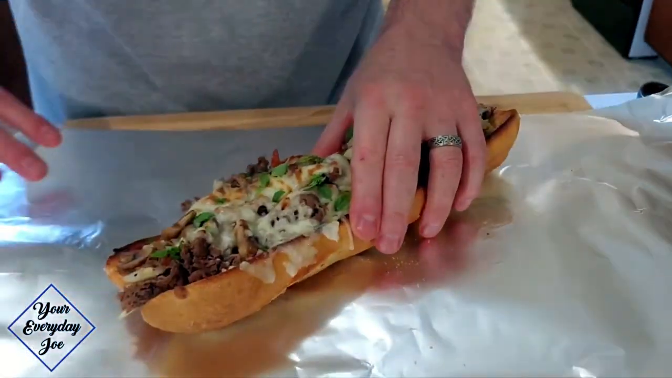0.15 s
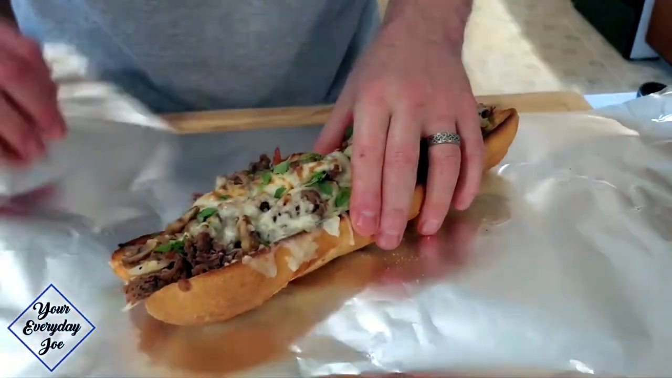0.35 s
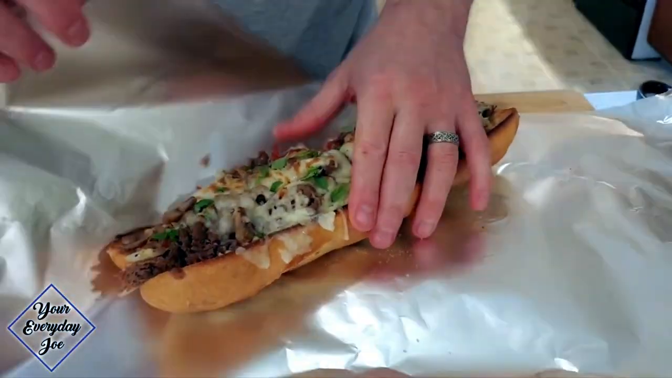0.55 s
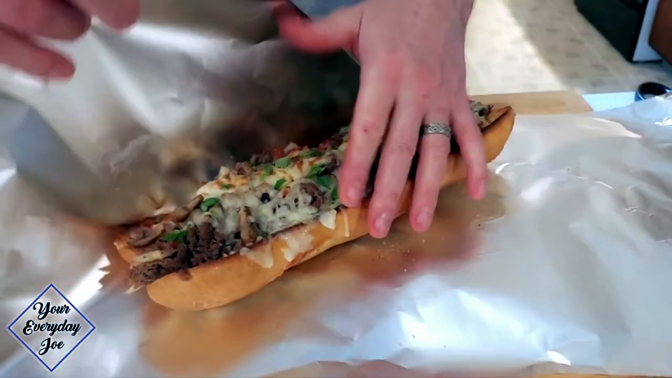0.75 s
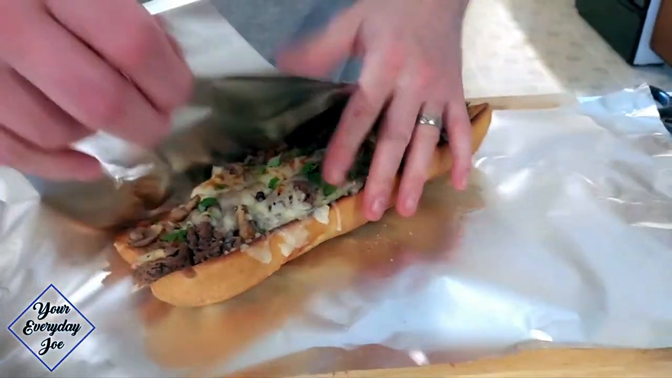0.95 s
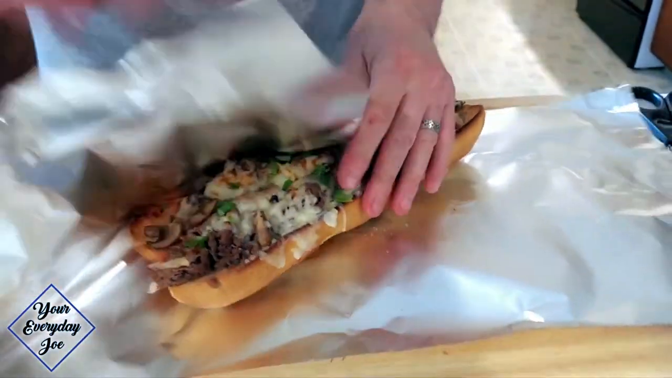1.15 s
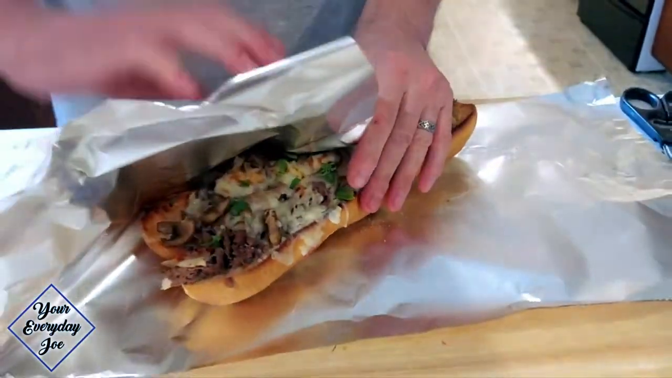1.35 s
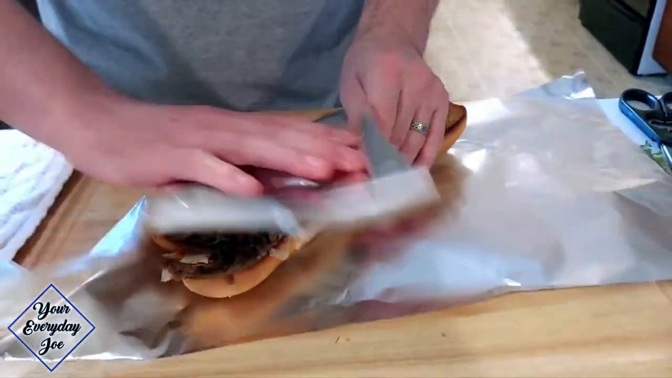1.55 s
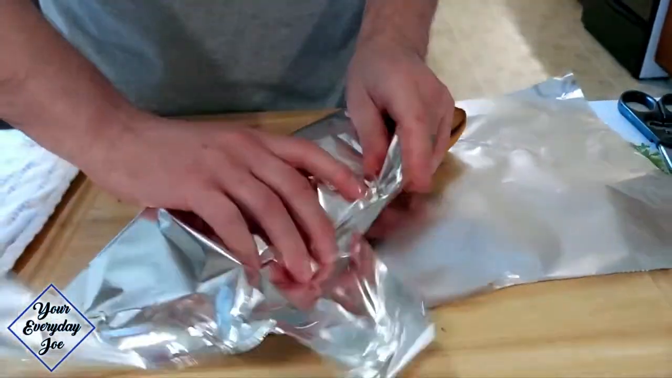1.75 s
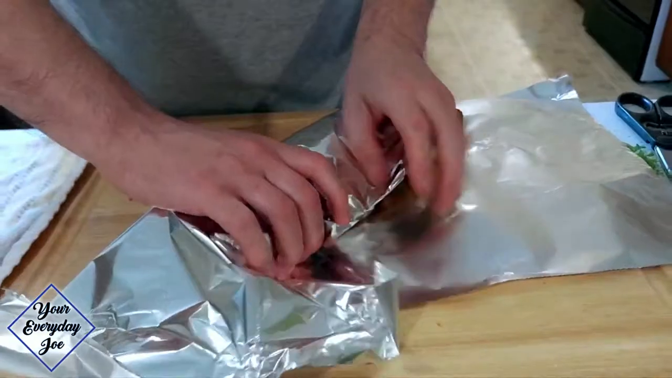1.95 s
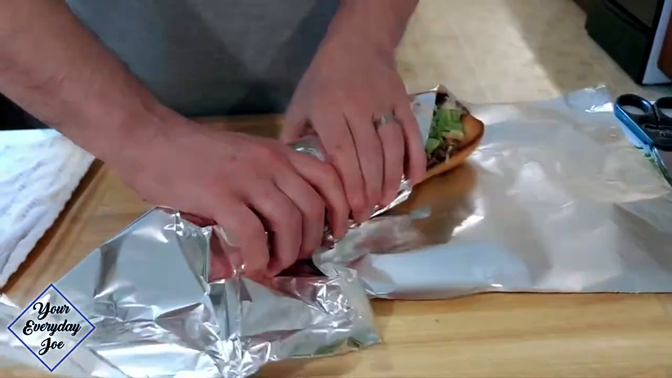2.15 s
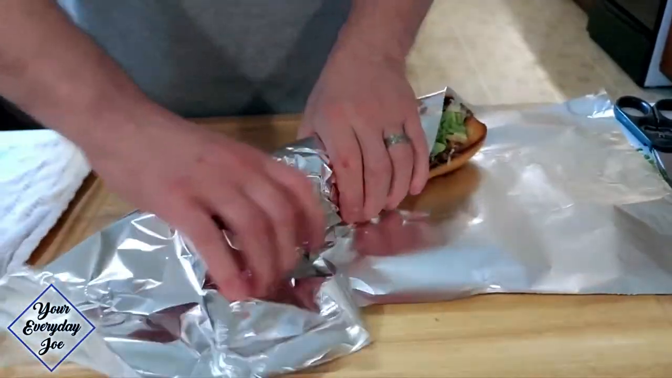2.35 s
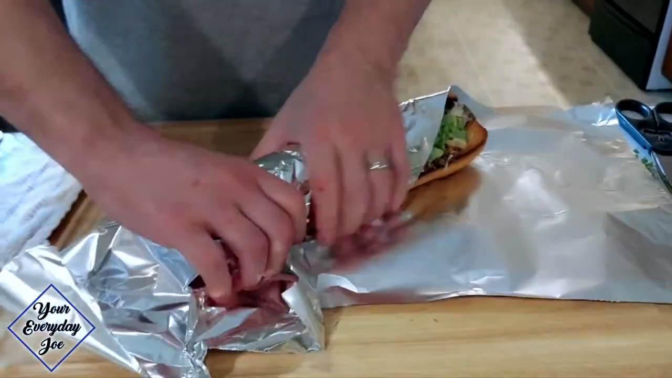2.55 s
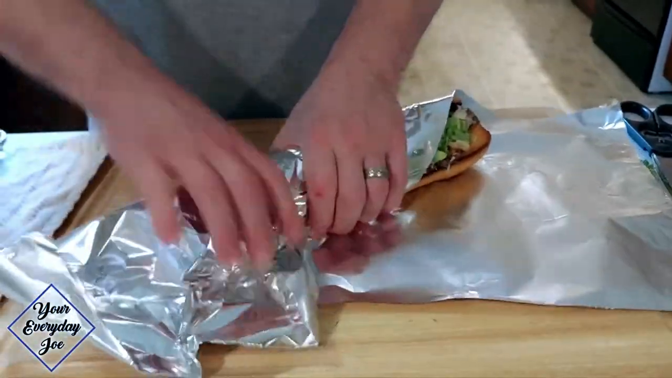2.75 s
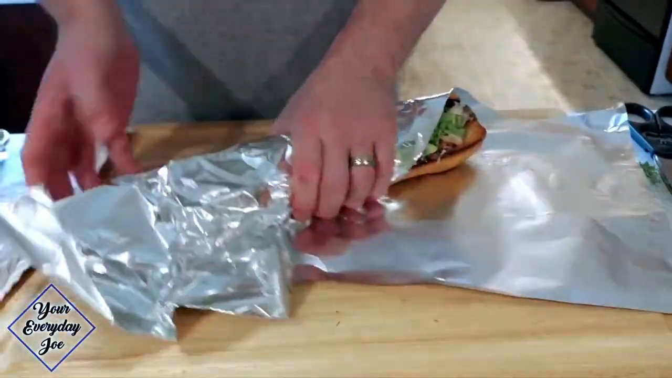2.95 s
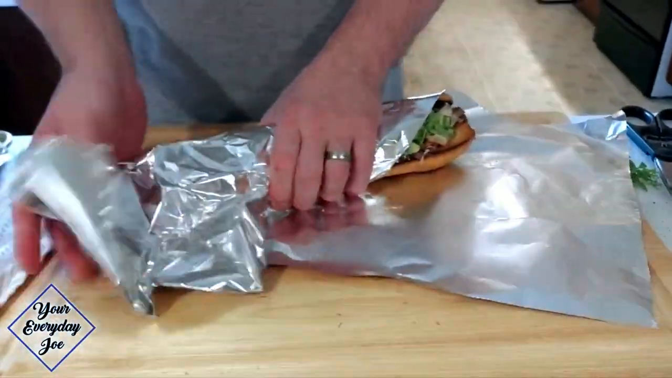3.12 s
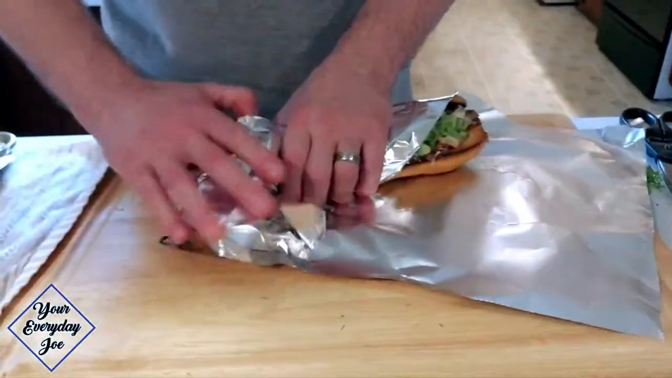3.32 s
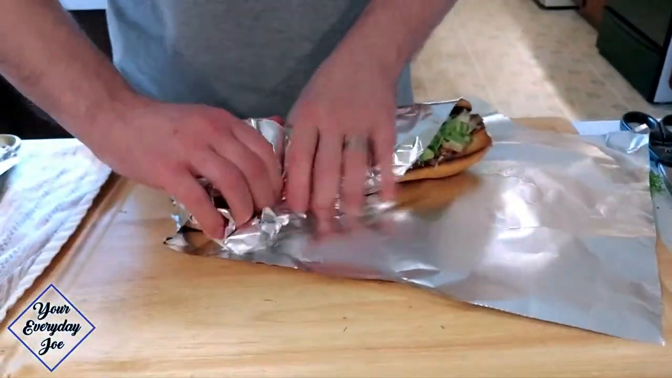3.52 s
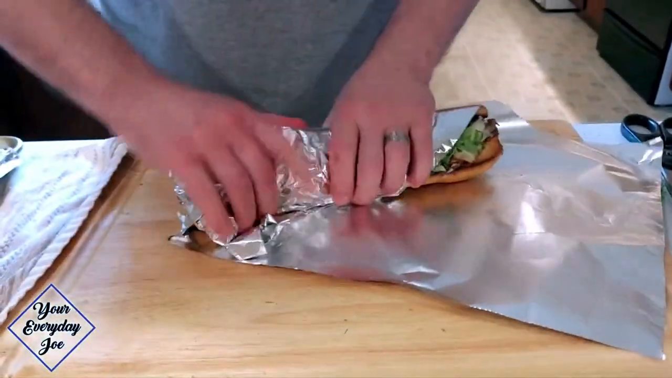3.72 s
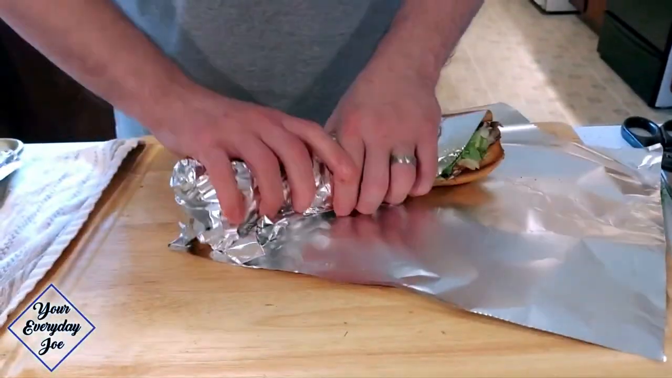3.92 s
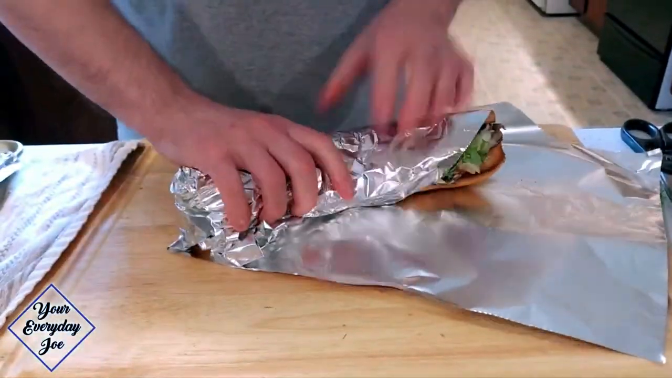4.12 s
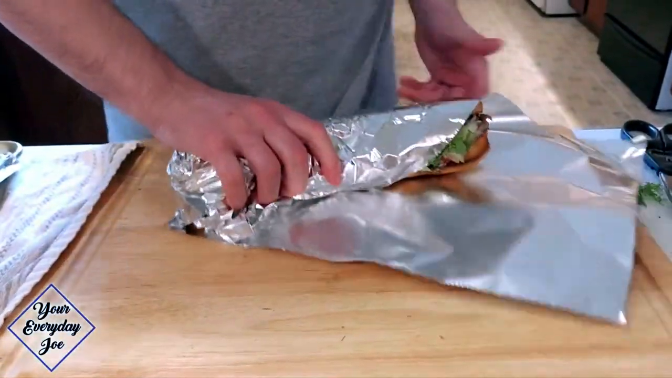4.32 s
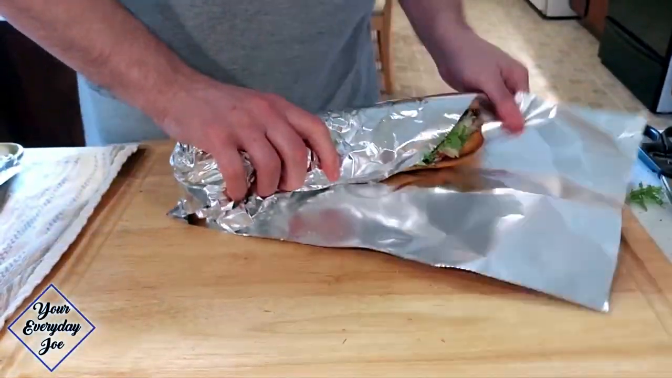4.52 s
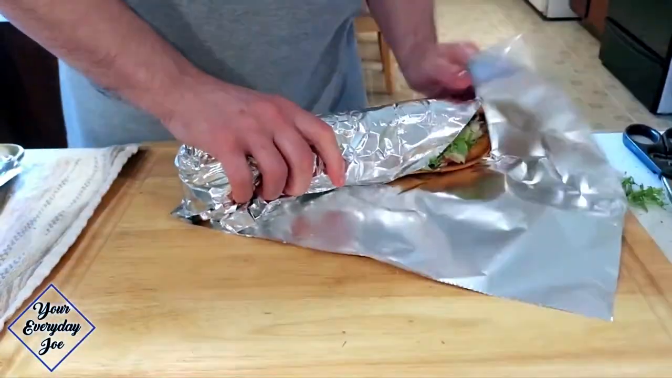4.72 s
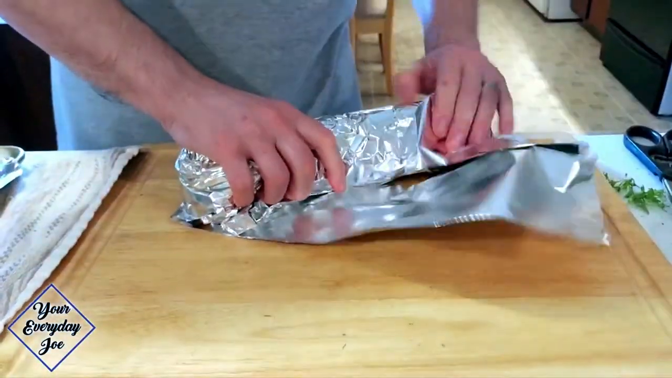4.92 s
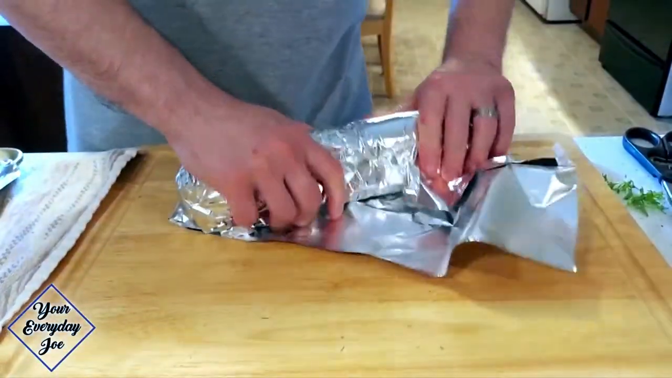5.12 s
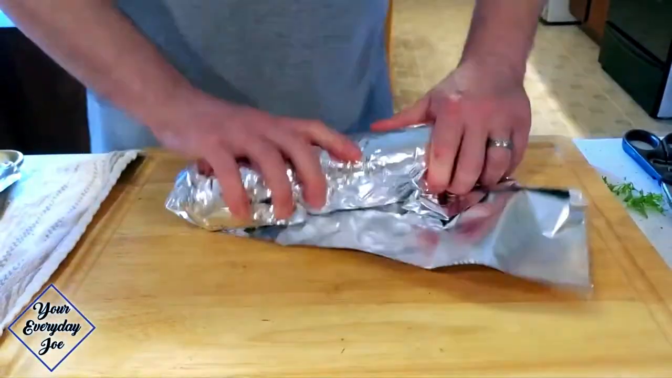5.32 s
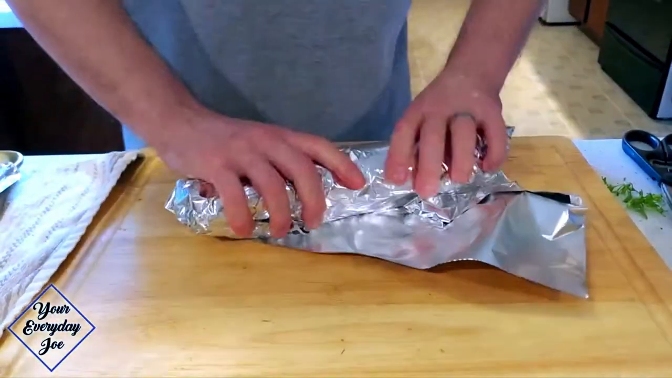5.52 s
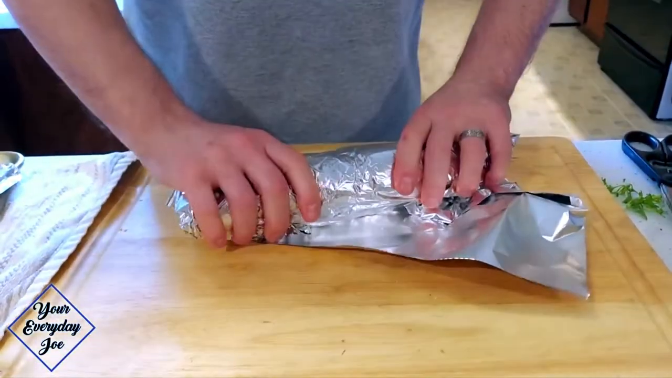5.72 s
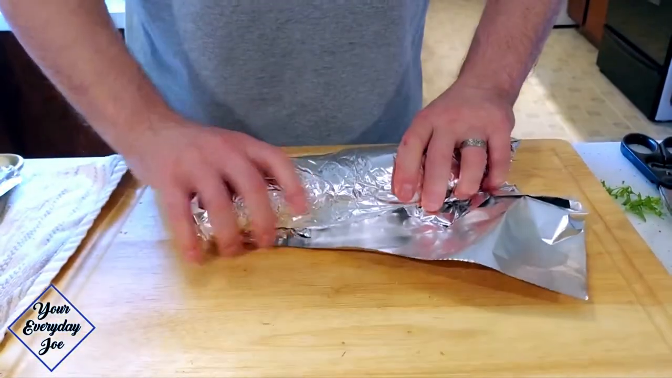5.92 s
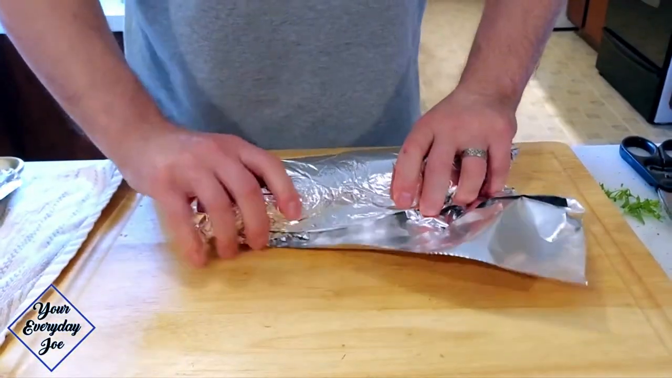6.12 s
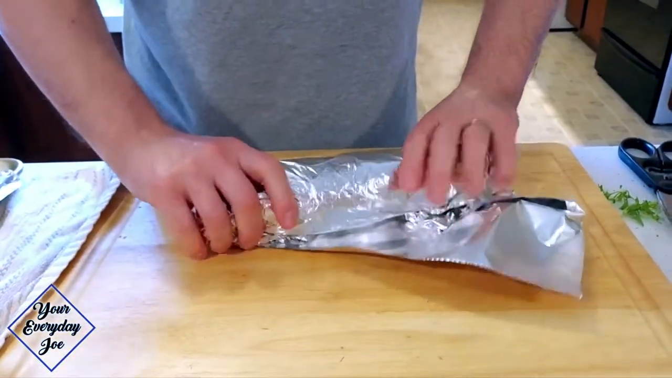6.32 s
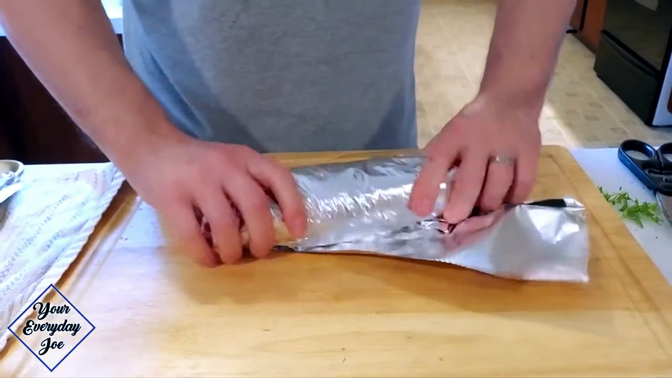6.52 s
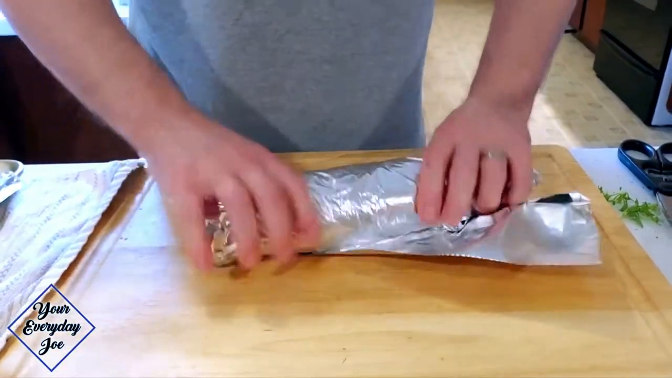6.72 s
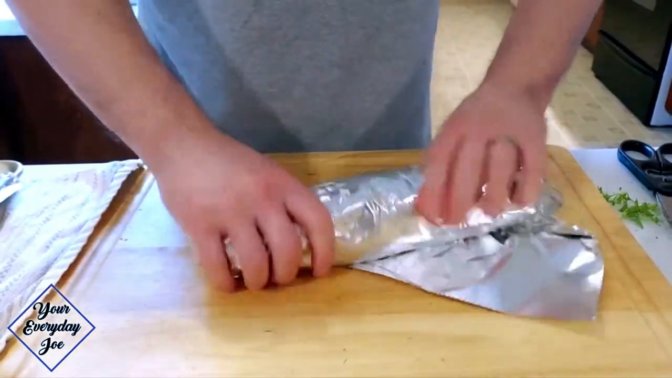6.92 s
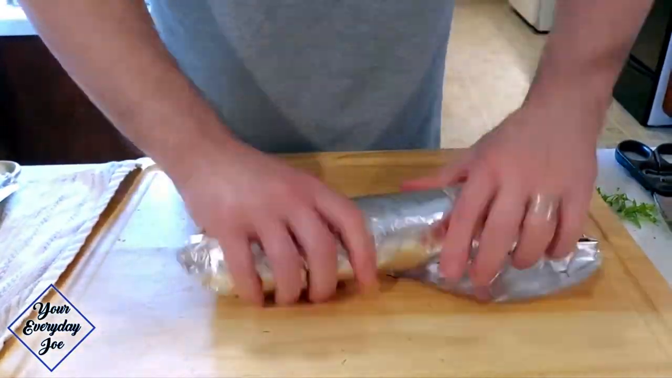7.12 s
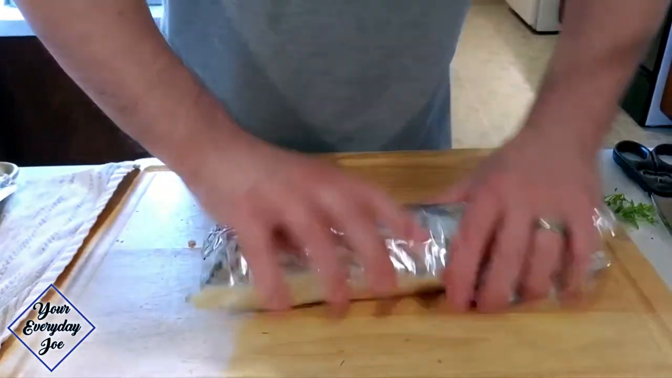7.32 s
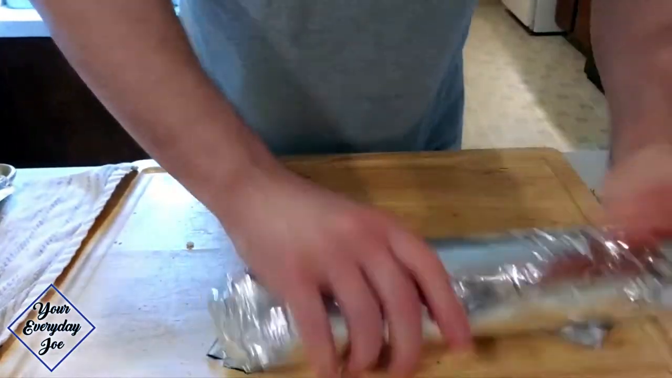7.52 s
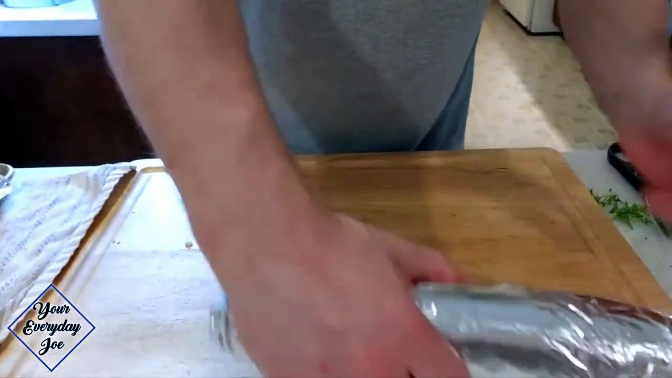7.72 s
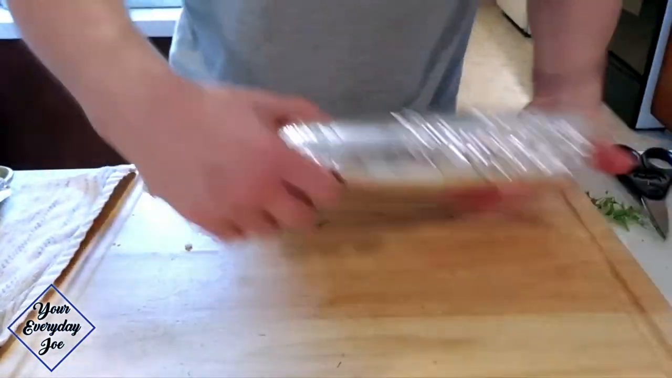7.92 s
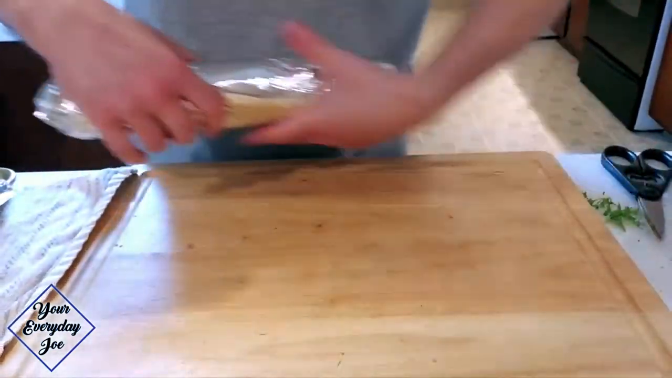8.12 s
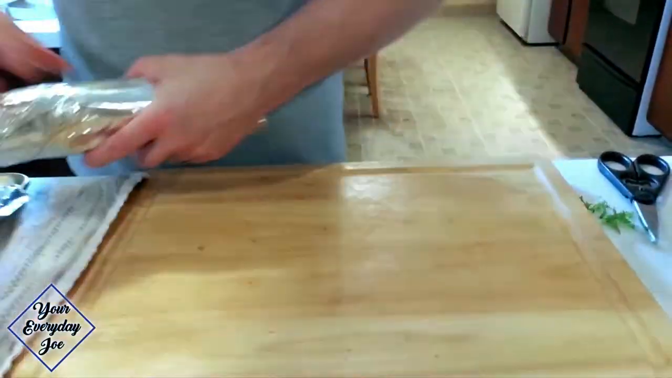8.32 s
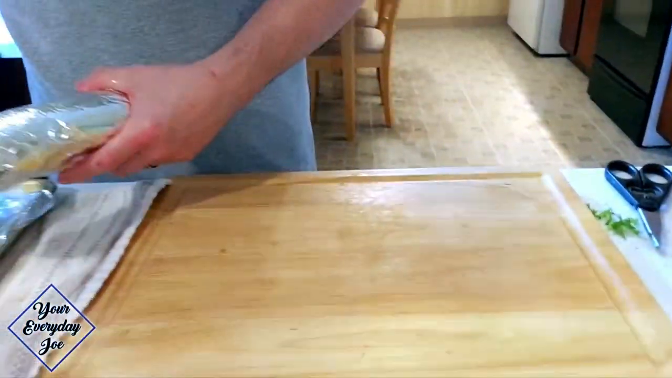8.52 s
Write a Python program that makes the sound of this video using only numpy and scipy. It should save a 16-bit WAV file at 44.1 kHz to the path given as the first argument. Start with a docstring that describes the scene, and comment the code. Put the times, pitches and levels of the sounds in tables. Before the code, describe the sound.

Out of near silence, a sheet of aluminum foil starts to rustle as hands fold it around a sandwich. Creases snap and each squeeze sets off a bright crackle, with small pops and soft booms as the sheet flexes. The crinkling briefly thins to dry ticks, then returns with low thuds on a wooden board. A few faint crinkles trail off. The microphone is close, in a quiet kitchen.

```python
"""Aluminium foil is folded and crushed by hand round a sandwich on a wooden board, close-miked in a kitchen.
Out of near silence the sheet starts to rustle: creases snap, each squeeze sets off a crackle of tiny
buckles, the open sheet booms softly as it flexes and air pockets pop. Around 6 s the crushed foil thins
to dry ticks, then the board thuds under the roll through a last run of squeezes. From 8 s a few faint
crinkles trail off into the hush."""
import sys
import numpy as np
from scipy import signal
from scipy.fft import rfft, irfft, next_fast_len
from scipy.io import wavfile
from scipy.ndimage import uniform_filter1d

SR = 44100
rng = np.random.default_rng(int(sys.argv[2]) if len(sys.argv) > 2 else 0)


def to_wav(sig):
    """Store sig (one row per channel, or 1-D mono) as 16-bit WAV at the path in sys.argv[1].

    Samples outside -1..1 are clipped; the rate is SR.
    """
    pcm = np.clip(np.atleast_2d(sig), -1, 1) * 32767
    pcm = np.round(pcm).astype(np.int16)
    wavfile.write(sys.argv[1], SR, pcm.T)  # frames by channels


N = 381773

# Levels are set ahead of the mix trims. An EQ gives only the shape of a spectrum.
# room tone: (frequency [Hz], level [dB])
HUSH_EQ = [(12, -57.5), (20, -19.5), (70, -14), (168, 0), (347, -7), (388, -24), (16000, -21.5)]
# where the foil sits between the mics: (time [s], lead of the left channel [samples])
LEFT_LEAD = [(0, 9.5), (1.3, 7), (1.8, 6.5), (4.2, 6.5), (4.7, -2.5), (7.2, -2.5), (7.7, -3.5), (8.6, 10)]
# state of the sheet: (time [s], left over right [dB], dryness from crushing [0-1], crackle trim [dB])
SHEET_STATE = [(0.2, 2, 0.1, 6.5), (0.55, 2, 0.25, 0), (0.72, 2, 0, -1), (1.33, -1, 0.6, 1),
               (1.61, 0.5, 0.38, -0.5), (2.17, -0.5, 0.44, 0.3), (3.02, 0.5, 0.2, -1.1),
               (4.58, -1, 0.12, 0.8), (5.09, 0, 0.2, -2), (5.92, -0.5, 0.88, 0), (6.1, 0, 0.66, -0.2),
               (7.5, -1, 0.47, 0.4), (7.66, -1.5, 0.44, 3), (7.92, -1.5, 0.26, 1.5), (8.34, 1, 0.7, 3.5),
               (8.65, -5.5, 0.23, 2)]
# rustle bed between squeezes: (time [s], sparkle [dB], body [dB], flexing relative to body [dB])
RUSTLE_BED = [(0.2, -106, -106, -20), (0.238, -81, -83, -30), (0.26, -43.5, -53.5, -40),
              (0.4, -41.5, -38.5, -13.5), (0.6, -25, -34, -9), (0.96, -64, -44.5, -3.5),
              (1.17, -33.5, -45, -2.5), (1.33, -52.5, -53.5, -38), (1.45, -39, -46.5, -4.5),
              (1.7, -31, -38.5, -9.5), (2.2, -39.5, -41.5, -10.5), (2.63, -39.5, -44, -12.5),
              (3.1, -31.5, -36.5, -6.5), (3.62, -36, -39, -16.5), (4.14, -48, -48, -19.5),
              (4.3, -33, -38.5, -7.5), (4.6, -30.5, -39.5, -9), (5.0, -37.5, -39, -13),
              (5.35, -32, -37, -9), (5.8, -53, -47, -34), (6.0, -51, -52, -26), (6.31, -42, -45.5, -52),
              (6.5, -45, -41.5, -22), (6.9, -32, -40.5, -9.5), (7.65, -39, -41, -15.5),
              (7.87, -86, -79, -43), (7.94, -69, -98, -32), (8.05, -58, -64, -40), (8.3, -60, -69, -38),
              (8.47, -105, -108, -22), (8.6, -115, -115, -11)]
# the foil's bands, from glittering top to soft bending: (frequency [Hz], level [dB])
SPARKLE_EQ = [(4120, -39.5), (7000, -6.5), (8470, 2), (10100, -1.5), (12400, 3.5), (15100, 0.5),
              (15900, -1)]
CRACKLE_EQ = [(1470, -32.5), (2500, -12.5), (3570, -0.5), (7000, -0.5), (9100, -7), (15400, -120)]
BODY_EQ = [(310, -30.5), (520, -9), (651, 1.5), (1020, -2.5), (1510, 0), (1800, 0), (2130, 1), (2590, -3.5),
           (2800, -2.5), (3640, -4.5), (6160, -120)]
FLEX_EQ = [(180, -68), (270, -18.5), (330, -1.5), (410, 2.5), (520, 3), (680, 2.5), (1140, -120)]
# creases giving way: (time [s], level [dB], body relative to that level [dB])
CREASE_SNAPS = [(0.242, -28.5, -35), (0.481, -10, -13.5), (0.553, -18.5, -24.5), (0.685, -13.5, -4),
                (0.7776, -17, -12), (0.843, -23, -16), (0.9202, -8, -20.5), (0.9877, -23, -19),
                (1.0863, -16, -18), (1.247, -24.5, -19), (1.298, -26, -31), (1.38, -34.5, -5),
                (1.3936, -18.5, -12), (1.5437, -25, -21), (1.6387, -13, -11), (1.7594, -20, -21),
                (1.8437, -20, -23), (2.004, -18, -24), (2.274, -18.5, -25), (2.39, -8.5, -24),
                (2.4249, -19, -21), (2.556, -19.5, -7), (2.596, -21, -4), (2.6654, -16.5, -25),
                (2.796, -16, -30), (2.884, -16, -8), (2.9804, -20.5, -6), (3.108, -11, -22),
                (3.1672, -17.5, -18.5), (3.18, -20.5, -23.5), (3.24, -16.5, -15), (3.491, -16.5, -2),
                (3.6671, -23.5, -17), (3.682, -11, -23), (3.725, -13, -7), (3.758, -16.5, 0.5),
                (3.775, -13.5, -8), (3.919, -19, -15), (3.979, -13.5, -36), (4.0362, -15.5, -27),
                (4.1041, -22, -9), (4.174, -27.5, 6.5), (4.201, -12, -26), (4.2783, -18.5, -20),
                (4.3244, -13, -22), (4.4425, -10, -31), (4.4792, -7.5, -34.5), (4.7, -12, -25.5),
                (4.823, -10.5, -34), (4.843, -8.5, -24), (5.024, -11, -23), (5.0924, -11.5, -11),
                (5.134, -20.5, 1.5), (5.219, -19, -22), (5.262, -19, -16.5), (5.314, -22, -0.5),
                (5.4913, -19.5, -28), (5.5647, -17, -25), (5.665, -21, -21), (5.6925, -21, -22),
                (5.8055, -30, -9), (5.876, -24.5, -17), (5.947, -26.5, -6.5), (6.1683, -25, -30),
                (6.3934, -20.5, -1.5), (6.4683, -23, 0), (6.535, -15, -12), (6.5799, -18, -22),
                (6.605, -16.5, -38), (6.685, -18, -6), (6.77, -17, -25), (6.801, -12, -27),
                (6.824, -18, -22), (6.925, -23, -24), (6.969, -22, -2.5), (7.057, -23.5, -4.5),
                (7.0936, -18.5, -12), (7.237, -10, -11), (7.2634, -20, -14), (7.306, -17, -6),
                (7.319, -15, -14), (7.3343, -12.5, -8.5), (7.3804, -15.5, -25), (7.419, -18, -26),
                (7.4445, -19.5, -21), (7.9706, -29, -32), (8.1793, -24, -9), (8.2093, -23.5, -8),
                (8.2658, -25.5, -11), ]
# squeezes of the hand, each a burst of buckles: (time [s], hold [s], sparkle [dB], body [dB])
HAND_SQUEEZES = [(.31, 0.041, -26, -45.5), (.36, 0.028, -21.5, -43), (.42, .02, -23.5, -37),
                 (.48, 0.044, -22, -38), (.7, 0.018, -18.5, -33.5), (.8, 0.05, -22.5, -37.5),
                 (.928, 0.003, -26, -44), (1.0, 0.0043, -26, -36), (1.095, 0.027, -29.5, -40),
                 (1.19, 0.016, -31, -59), (1.4, 0.0065, -51, -48), (1.49, 0.046, -31.5, -44.5),
                 (1.64, 0.13, -36, -40.5), (1.76, 0.055, -38, -53), (1.935, 0.0073, -26.5, -55),
                 (2.035, 0.0084, -28.5, -45), (2.1, 0.029, -29.5, -39), (2.195, 0.014, -40, -36.5),
                 (2.31, 0.052, -27.5, -38), (2.395, 0.069, -28, -38.5), (2.56, 0.058, -50, -44),
                 (2.7, 0.0078, -20, -37.5), (2.755, 0.0077, -27.5, -41.5), (2.94, 0.04, -32.5, -34),
                 (3.06, 0.034, -35.5, -34.5), (3.17, 0.02, -27.5, -35), (3.255, 0.009, -22, -27),
                 (3.35, 0.0066, -31, -33.5), (3.5, 0.025, -22, -42.5), (3.69, 0.016, -25, -39.5),
                 (3.78, 0.0063, -18, -40), (3.92, 0.011, -31, -41), (3.985, 0.027, -34, -42.5),
                 (4.05, 0.023, -37.5, -48.5), (4.21, 0.0034, -22.5, -49), (4.33, 0.023, -26.5, -44.5),
                 (4.49, 0.034, -20, -36), (4.63, 0.033, -28, -35), (4.71, 0.0044, -19.5, -71),
                 (4.84, 0.067, -24.5, -40), (4.995, 0.0052, -20.5, -36.5), (5.03, 0.0047, -20, -43.5),
                 (5.15, 0.038, -29.5, -36.5), (5.37, 0.0058, -25, -34.5), (5.5, 0.047, -48, -40.5),
                 (5.57, 0.055, -38, -50), (5.68, 0.013, -29.5, -38), (5.81, 0.0036, -42, -45),
                 (5.88, 0.015, -43, -45), (5.96, 0.036, -43, -41.5), (6.39, 0.0038, -46, -43),
                 (6.47, 0.029, -30.5, -42.5), (6.54, 0.014, -31, -41), (6.77, 0.076, -28, -36),
                 (6.93, 0.12, -38, -41), (7.1, 0.053, -32, -37.5), (7.245, .02, -36, -45),
                 (7.32, 0.048, -27.5, -38), (7.42, 0.011, -36, -35), (7.62, 0.1, -35.5, -48.5),
                 (7.975, 0.037, -44.5, -55), (8.1, 0.079, -50, -63), (8.18, 0.015, -48, -42.5),
                 (8.266, 0.023, -49.5, -52)]
# weight put on the board: (time [s], hold [s], board rumble [dB], boom of the open sheet [dB])
HAND_LEANS = [(.39, 0.12, -57, -52), (.5, 0.15, -58, -58), (.7, 0.014, -47.5, -34),
              (.8, 0.07, -48.5, -46.5), (.93, 0.077, -47.5, -44), (1.09, 0.023, -55, -50),
              (1.54, 0.1, -78, -73), (2.09, 0.12, -66, -62), (2.3, 0.055, -65, -70),
              (2.4, 0.033, -53, -53.5), (2.99, 0.012, -56, -37.5), (3.1, 0.047, -60.5, -50),
              (3.27, 0.01, -50, -40), (3.52, 0.12, -66, -92), (4.3, 0.081, -83, -83),
              (4.46, 0.11, -47.5, -58), (4.6, 0.027, -53, -42.5), (4.9, 0.043, -68, -73),
              (5.19, 0.019, -54, -62), (5.36, 0.014, -47, -56), (5.51, .02, -56, -80),
              (5.62, 0.11, -63.5, -94), (5.98, 0.04, -60.5, -78), (6.41, 0.034, -63, -70),
              (6.51, 0.016, -55, -80), (6.72, 0.046, -54, -64), (6.83, 0.015, -40, -54),
              (6.99, 0.073, -44.5, -67), (7.16, 0.068, -47, -67), (7.34, 0.018, -43.5, -78),
              (7.45, 0.082, -47, -56.5), (7.59, 0.031, -45, -66), (7.68, 0.062, -55, -73)]
# the board's rumble and the sheet's hollow boom: (frequency [Hz], level [dB])
RUMBLE_EQ = [(18, -49), (30, -20.5), (55, -1), (75, 0.5), (113, -3), (141, -5), (180, -15), (230, -50.5),
             (400, -120)]
BOOM_EQ = [(88, -32.5), (150, -4), (215, -8.5), (258, -3), (290, -3), (380, -6), (640, -120)]
# air pockets collapsing under the foil, and brief mid tones of a scrape at 7.6 and 8.21 s: (time [s], level
# [dB], pitch [Hz])
POCKET_POPS = [(0.515, -22.5, 617), (0.683, -26, 586), (0.989, -27.5, 910), (1.379, -28, 586),
               (2.085, -21, 524), (2.226, -26, 770), (2.285, -27.5, 762), (2.557, -25.5, 1860),
               (3.232, -15.5, 920), (3.255, -12.5, 600), (3.472, -17.5, 1640), (4.495, -13.5, 440),
               (5.218, -23.5, 736), (5.807, -31.5, 1620), (5.885, -26.5, 527), (5.947, -31, 1530),
               (6.391, -28, 1460), (6.796, -32, 1860), (6.834, -20.5, 1520), (6.926, -27, 1330),
               (7.415, -28, 670), (7.601, -23, 713), (8.18, -24, 1720), (8.21, -36, 706)]
# the foil falls quiet ahead of an accent: (end time [s], length [s], depth [dB])
FOIL_LULLS = [(0.914, 0.02, 4), (0.68, 0.034, 3.5), (2.384, 0.012, 1), (2.79, 0.029, 6), (3.77, 0.014, 12),
              (4.188, 0.035, 6), (5.216, .015, 5), (5.489, 0.061, 4.5), (5.794, 0.016, 6), (5.946, .02, 1),
              (6.459, 0.022, 2), (6.928, 0.018, 6.5), (7.968, 0.043, 20)]
# thuds on the board: (time [s], level [dB], pitch [Hz])
BOARD_THUDS = [(0.987, -49, 108), (1.083, -50, 97), (3.075, -38.5, 132), (5.35, -37.5, 81.5),
               (6.391, -39, 71.4), (6.71, -36.5, 74.4), (6.813, -35, 71), (6.977, -29, 75),
               (7.157, -29.5, 70), (7.322, -40, 95), (7.443, -31, 74.7), (7.67, -35.5, 66.4)]
# dents flipping over, each a dry tick: (time [s], level [dB], pitch [Hz])
DENT_TICKS = [(1.6612, -12.5, 11700), (1.8377, -13, 4300), (2.3905, -13.5, 11900), (2.4593, -19, 10900),
              (2.7982, -9.5, 13260), (3.181, -9, 8700), (3.4066, -11, 11100), (3.494, -8, 9000),
              (3.6462, -22, 6700), (3.7266, -7.5, 9100), (3.8945, -21, 7000), (3.9604, -21, 7600),
              (4.036, -19, 12470), (4.1758, -12, 2420), (4.2785, -25, 12500), (5.137, -36, 2720),
              (5.219, -10, 11700), (5.2625, -20.5, 9000), (5.3165, -17, 10000), (5.4933, -17, 10050),
              (5.521, -12.5, 3640), (5.7568, -21, 4200), (5.8075, -17, 3010), (5.8779, -21, 8100),
              (5.93, -27, 2610), (5.9486, -19, 3160), (5.9791, -21, 4980), (6.024, -26.5, 5100),
              (6.0789, -32, 4300), (6.0915, -25, 7000), (6.1407, -21, 4300), (6.17, -26, 11560),
              (6.189, -30, 7200), (6.318, -17, 4500), (6.3961, -21, 2280), (6.46, -23, 9000),
              (6.5186, -18, 2750), (6.638, -15, 15100), (6.7561, -13, 4050), (6.9275, -12, 13600),
              (7.0592, -14, 4900), (7.0776, -17, 6100), (7.129, -15, 5100), (7.1815, -16, 10850),
              (7.2023, -22, 3900), (7.239, -10, 8100), (7.491, -14.5, 6100), (7.5086, -17.5, 3300),
              (7.5821, -17, 12440), (7.5943, -15, 11400), (7.719, -25, 7140), (7.728, -27, 9000),
              (7.7425, -21, 5970), (7.913, -58, 5500), (7.7735, -33, 6250), (8.1803, -30, 2300),
              (8.2674, -21, 12340), (8.2912, -30, 7800), (8.611, -50, 7000)]

THIN_HZ = 420  # pings, pops and ticks are cut below this
SNAP_RISE_S, SNAP_RING_S = 0.0018, 0.078  # attack and t60 of a crease in the open sheet
DRY_SHORTENS, DRY_CRACK_DB = 0.24, 6  # fully crushed foil: share of ring lost, boost of the crack
TICK_RISE_S, TICK_FALL_S, TICK_CYCLES = 0.00025, 0.00015, 0.34  # the fall grows by this many cycles
TOP_HZ = 15810  # band limit of the output


def amp(db):
    """Decibels to amplitude; amp(2 * db) gives power."""
    return np.exp(np.asarray(db) * (np.log(10) / 20))


def unit(x):
    """Normalise to an rms of 1."""
    return x / np.sqrt(np.mean(x ** 2) + 1e-20)


def curves(rows):
    """Automation lanes: one value per sample for each column after the time."""
    times, *columns = np.transpose(rows)
    return [np.interp(np.arange(N) / SR, times, column) for column in columns]


def lead_at(s):
    """Samples by which the left channel leads at time s."""
    return np.interp(s, *np.transpose(LEFT_LEAD))


def filtered(x, response):
    """Zero-phase filter with gain response(hz)."""
    size = next_fast_len(N + SR // 4)
    return irfft(rfft(x, size) * response(np.fft.rfftfreq(size, 1 / SR)), size)[..., :N]


def colour(x, eq):
    """Apply an EQ on a log frequency axis, with make-up gain so white noise keeps its power."""
    points_hz, points_db = np.transpose(eq)

    def gain(hz):
        return amp(np.interp(np.log(hz + 1), np.log(points_hz + 1), points_db))
    return filtered(x, gain) / np.sqrt(np.mean(gain(np.linspace(0, SR / 2, 4000)) ** 2))


def fade(power, t60):
    """Give a power envelope a tail that falls 60 dB in t60 seconds, its sum kept."""
    keep = amp(-120 / (t60 * SR))
    return np.abs(signal.lfilter([1 - keep], [1, -keep], power))


def shimmer(shared, patchy_db):
    """Stereo noise flickering in time and pitch; the shared part reaches the nearer mic first."""
    hz, t, noise = signal.stft(rng.standard_normal((3, N), np.float32), SR, nperseg=256)
    patches = uniform_filter1d(rng.standard_normal(noise.shape[1:]), size=5, axis=0)
    patches = uniform_filter1d(patches, size=4, axis=1)
    turn = np.exp(1j * np.pi * hz[:, None] * lead_at(t) / SR)
    pair = np.sqrt(shared) * noise[0] * np.array([turn, turn.conj()]) + np.sqrt(1 - shared) * noise[1:]
    return unit(signal.istft(pair * amp(patchy_db * unit(patches)), SR, nperseg=256)[1][:, :N])


def swells(rows, rise_s, fall_db_per_s):
    """Hand gestures as power, a lane per level column: each swells up to its time, holds and falls."""
    out, t = np.zeros((len(rows[0]) - 2, N + SR)), np.arange(-SR // 10, SR // 2) / SR
    attack = np.clip(1 + t / rise_s, 0, 1) ** 4
    for s, hold, *db in rows:
        shape = attack * amp(-2 * fall_db_per_s * np.maximum(t - hold, 0))
        out[:, round(s * SR):][:, :len(t)] += amp(db)[:, None] ** 2 * shape
    return out[:, SR // 10:][:, :N]


def hush():
    """Faint, low room tone under everything."""
    return amp(-92) * colour(rng.standard_normal((2, N)), HUSH_EQ)


def buckles(per_s, spread_db):
    """The foil buckles at random moments with uneven strength: power spikes with a mean of 1."""
    chance, size = rng.random(N), rng.exponential(size=N)
    power = (chance < per_s / SR) * amp(2 * spread_db * np.minimum(size, 3.2))
    return power / power.mean()


def sheet_ring(power, click_share, click_s, ring_s):
    """Each buckle clicks, then rings on through the sheet: a power envelope with two t60s."""
    return click_share * fade(power, click_s) + (1 - click_share) * fade(power, ring_s)


def tension(depth, span_s):
    """Power gain that ducks the buckles for 50 ms while a crease takes up tension before it snaps."""
    gain, t = np.ones(N + SR), np.arange(SR // 20) / SR
    for s, *_ in CREASE_SNAPS:
        gain[round(s * SR) - len(t):][:len(t)] *= 1 - depth * np.exp((t - t[-1]) / span_s)
    return gain[:N]


def creases(levels_db, ring_stretch):
    """Power of the snaps: a burst and a ring. Crushed foil gives way faster and rings shorter."""
    power, t = np.zeros(N + SR), np.arange(SR // 8) / SR
    burst = 2.5 * amp(-120 * t / 0.007)
    state_s, _, state_dryness, _ = np.transpose(SHEET_STATE)
    for (s, *_), db in zip(CREASE_SNAPS, levels_db):
        dryness = np.interp(s, state_s, state_dryness)
        ring = amp(-120 * t / (ring_stretch * SNAP_RING_S * (1 - DRY_SHORTENS * dryness)))
        attack = 1 - np.exp(-t / (1e-4 + SNAP_RISE_S * np.clip(1 - 2 * dryness, 0, 1)))
        power[round(s * SR) + 16:][:len(t)] += amp(2 * db) * (burst + ring) * attack
    return power[:N]


def cracks():
    """Each snap's transient: a bare pulse and two quick echoes off the board, nearer mic first."""
    out, scatter = np.zeros((2, N + SR)), rng.random((len(CREASE_SNAPS), 6))
    for (s, db, _), jitter in zip(CREASE_SNAPS, scatter):
        half_lead = lead_at(s) / 2
        for side, shift in enumerate((-half_lead, half_lead)):
            first = round(s * SR + shift) + 24
            out[side, first] += amp(db)
            out[side, first + 6 + int(40 * jitter[side])] -= 0.23 * amp(db)
            out[side, first + 50 + int(90 * jitter[side + 2])] += 0.5 * amp(db)
    return out[:, :N]


def pings(level_db, count):
    """Flat facets ring for a moment, each at its own pitch and pan; their level rides level_db."""
    when, pitch, strength, pan = rng.random((count, 4)).T[:, :, None]
    t = np.arange(900) / SR
    start = (when * N).astype(int)
    hz = 1000 * amp(15 * pitch)  # 1 to 5.6 kHz
    envelope = amp(-60 * t / 0.022) * (1 - np.exp(-t / 0.00029)) * (1 - t / t[-1])
    waves = amp(-3 * np.log(strength + 0.03)) * np.sin(2 * np.pi * hz * t) * envelope
    waves = waves / np.sqrt(np.sum(waves ** 2) / N) * amp(level_db[start])
    at = (start + np.arange(len(t))).ravel()
    sides = np.cos(pan * np.pi / 2), np.sin(pan * np.pi / 2)
    return np.array([np.bincount(at, (waves * gain).ravel(), N)[:N] for gain in sides])


def ticks(level_db, count):
    """Small dents flip with a tick of a cycle or two: the cued ones, plus strays riding level_db."""
    when, strength, pitch, _ = rng.random((count, 4)).T
    t = np.arange(-24, 120) / SR
    stray_s = when * (N / SR - 0.01)
    stray_db = level_db[(stray_s * SR).astype(int)] - 3.1 * np.log(strength + 0.039)
    strays = np.transpose([stray_s, stray_db, 2200 * amp(17 * pitch)])  # 2.2 to 15.6 kHz
    s, db, hz = np.vstack([DENT_TICKS, strays]).T[:, :, None]
    attack = np.exp(-(t / TICK_RISE_S) ** 2)
    decay = np.exp(-np.abs(t) / (TICK_FALL_S + TICK_CYCLES / hz))
    waves = amp(db - 2) * np.where(t < 0, attack, decay) * np.cos(2 * np.pi * hz * t)
    half_lead, out = lead_at(s) / 2, []
    for shift in (-half_lead, half_lead):
        at = np.round((s + t) * SR + shift).astype(int).clip(0, N - 1)
        out.append(np.bincount(at.ravel(), waves.ravel(), N))
    return np.array(out)


def foil():
    """The same buckles drive sparkle, crackle and a duller body; crushed foil ticks drier than open."""
    # how hard the hands work each band, as power
    sparkle_db, body_db, flex_db = curves(RUSTLE_BED)
    squeezes = swells(HAND_SQUEEZES, rise_s=0.05, fall_db_per_s=296)
    high, low = (amp([2 * sparkle_db, 2 * body_db]) + squeezes) * lulls()
    mid = np.sqrt(high * low)
    pan_db, dryness, crackle_db = curves(SHEET_STATE)
    open_grain = (1 - dryness) * (1.37 + 0.091 * buckles(280, spread_db=1)) * tension(0.27, span_s=0.32)
    dry_grain = dryness * buckles(220, spread_db=-2)
    _, snap_db, snap_body_db = np.transpose(CREASE_SNAPS)
    spray = tick_spray(level_db=-12, t60=0.01)

    # power envelope of each band
    sparkle = amp(-2.5) * (sheet_ring(high * open_grain, 0.21, 0.004, 0.014) + fade(high * dry_grain, 0.0045))
    sparkle += creases(snap_db - 9, ring_stretch=1) + spray
    crackle = sheet_ring(mid * open_grain, 0.24, 0.004, 0.017) + fade(mid * dry_grain, 0.015)
    crackle *= amp(2 * crackle_db)
    crackle += creases(snap_db - 14.5, ring_stretch=1.2) + amp(-9) * spray
    body = amp(-3.5) * (sheet_ring(low * open_grain, 0.37, 0.014, 0.026) + fade(low * dry_grain, 0.048))
    body += creases(snap_db + snap_body_db - 9.5, ring_stretch=0.99)
    bends = low * amp(2 * flex_db - 2.5) * buckles(60, spread_db=1.5)
    flex = sheet_ring(bends, click_share=0.26, click_s=0.0033, ring_s=0.16)

    # the envelopes shape noise, widest at the top; cracks sharpen the two bright bands
    crack = cracks() * amp(DRY_CRACK_DB * dryness)
    top = np.sqrt(sparkle) * shimmer(0.039, patchy_db=2.5) + amp(-11.5) * crack
    mix = colour(top, SPARKLE_EQ) * amp([[1.2], [-1.2]])
    mix += colour(np.sqrt(crackle) * shimmer(0.18, patchy_db=2) + amp(-16) * crack, CRACKLE_EQ)
    mix += colour(np.sqrt(body) * shimmer(0.63, patchy_db=2), BODY_EQ) * amp([[-0.9], [0.9]])
    details = pings(10 * np.log10(low) - 5.5, count=1500) + pops()
    details += ticks(10 * np.log10(mid * (dryness + 0.038)) + 7.5, count=700)
    mix += filtered(details, lambda hz: hz ** 4 / (hz ** 4 + THIN_HZ ** 4))
    mix += colour(np.sqrt(flex) * shimmer(0.73, patchy_db=0.5), FLEX_EQ)
    return mix * amp(np.array([pan_db, -pan_db]) / 2)


def kitchen(x):
    """The room answers with a short diffuse tail, different at each mic."""
    t = np.arange(SR // 4) / SR
    tail = rng.standard_normal((2, len(t))) * amp(-60 * t / 0.11) * (1 - np.exp(-t / 0.004))
    return signal.oaconvolve(x, tail / np.linalg.norm(tail[0]), axes=1)[:, :N]


def leans():
    """The board rumbles under the hands; above it the open sheet booms, quicker to come and go."""
    rumble = np.sqrt(swells(HAND_LEANS, rise_s=0.079, fall_db_per_s=250)[0])
    boom = np.sqrt(swells(HAND_LEANS, rise_s=0.053, fall_db_per_s=390)[1])
    noise = shimmer(0.77, patchy_db=1.5)
    return rumble * colour(noise, RUMBLE_EQ) + boom * colour(noise[:, ::-1], BOOM_EQ)


def pops():
    """Each pop rings briefly, with a weaker overtone."""
    out, t = np.zeros(N + SR), np.arange(SR // 10) / SR
    attack = 1 - np.exp(-t / 0.00091)
    for s, db, hz in POCKET_POPS:
        ring = np.sin(2 * np.pi * hz * t) + 0.5 * np.sin(2 * np.pi * 1.4 * hz * t)
        out[round(s * SR):][:len(t)] += amp(db - 6.5 - 60 * t / 0.045) * ring * attack
    return out[:N]


def lulls():
    """Power gain that sinks ahead of an accent and jumps back as it lands."""
    dip_db, t = np.zeros(N), np.arange(N) / SR
    for s, length, db in FOIL_LULLS:
        dip_db -= db * (t < s) * np.clip(2 + 2 * (t - s) / length, 0, 1)
    return amp(2 * dip_db)


def thuds():
    """The board answers each drop of the roll with a few low cycles."""
    out, t = np.zeros(N + SR), np.arange(SR // 3) / SR
    envelope = amp(-60 * t / 0.22) * (1 - np.exp(-t / 0.0092))
    for s, db, hz in BOARD_THUDS:
        out[round(s * SR):][:len(t)] += amp(db + 1.5) * np.sin(2 * np.pi * hz * t) * envelope
    return out[:N]


def tick_spray(level_db, t60):
    """Power of the brief broad hiss each cued tick throws off, level_db relative to its cue."""
    s, db, _ = np.transpose(DENT_TICKS)
    kicks = np.bincount(np.round(s * SR).astype(int), amp(2 * (db + level_db)), N)
    return signal.lfilter([1], [1, -amp(-120 / (t60 * SR))], kicks)


def scene():
    """Close foil with a touch of kitchen, over the board's low end and the room tone."""
    room_tone = hush()
    wrap = foil()
    reverb = amp(-8) * kitchen(wrap)
    low_end = (leans() + thuds()) * amp([[-0.4], [0.4]])
    return room_tone + wrap + reverb + low_end


def record(dry):
    """A steep high cut closes over the last 120 Hz below the band limit."""
    return filtered(dry, lambda hz: np.sin(np.pi / 2 * np.clip((TOP_HZ - hz) / 120, 0, 1)) ** 2)


dry = scene()
out = record(dry)
to_wav(out)
```